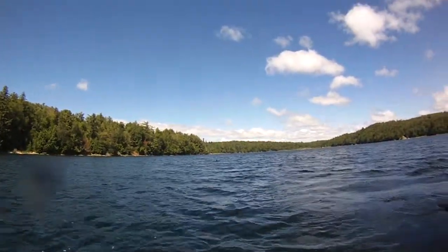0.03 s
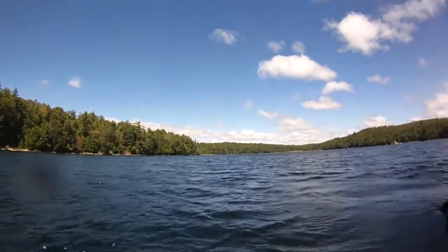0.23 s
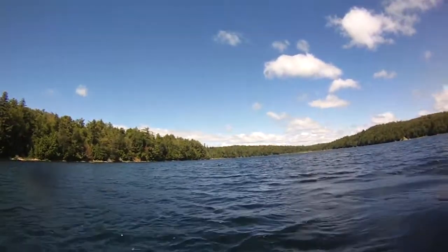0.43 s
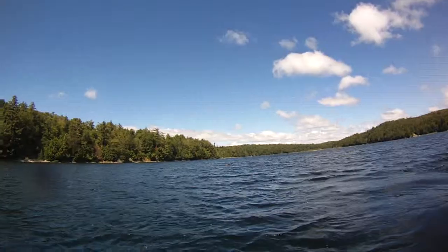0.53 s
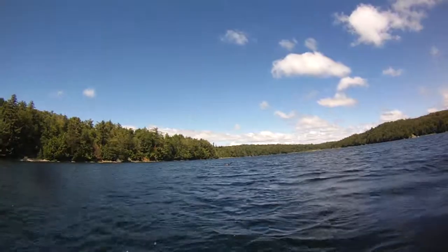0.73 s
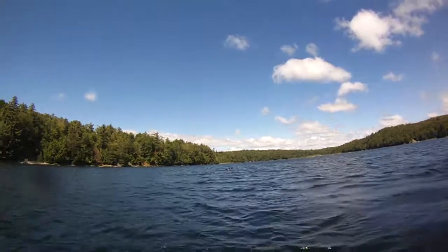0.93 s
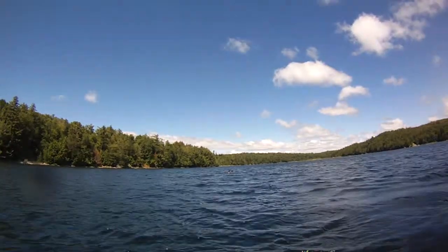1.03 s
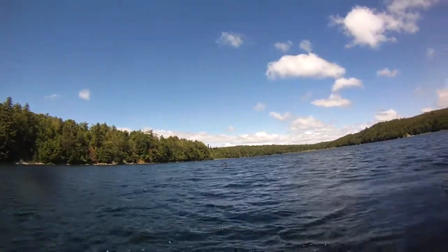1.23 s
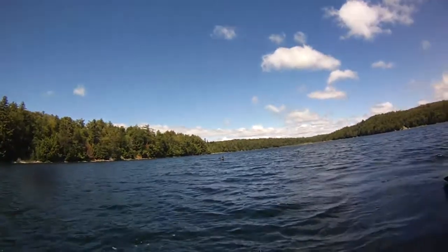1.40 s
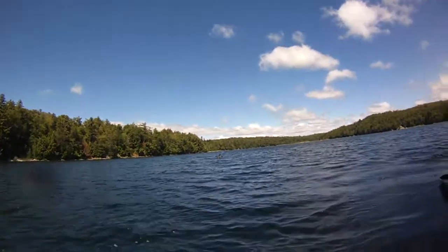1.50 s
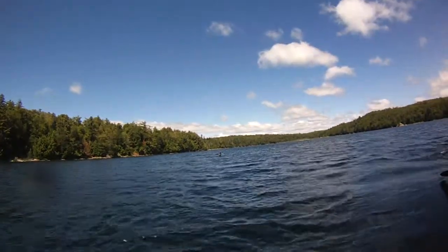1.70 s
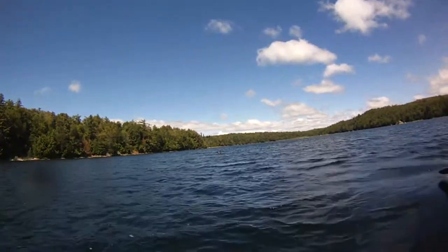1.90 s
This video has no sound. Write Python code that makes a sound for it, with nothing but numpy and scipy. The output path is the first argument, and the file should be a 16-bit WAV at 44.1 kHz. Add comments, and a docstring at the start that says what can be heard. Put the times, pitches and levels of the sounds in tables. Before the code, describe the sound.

One sharp knock on a camera case, with soft ripples bumping a boat hull over hiss.

```python
"""A small cased camera rides low on a boat over a quiet lake, its microphone hissing steadily. From 0.1 s come
light ticks on the case and soft, hollow bumps, probably ripples ringing the hull and pockets of trapped air,
over a low wash. At 0.24 s something knocks once against the case, with a short scuff, a few sharp contacts
around the blow and a faint after-ring of the mount. After 0.6 s ticks and bumps grow sparse; the last tick
falls at 1.3 s, the last bump at 1.8 s."""
import sys
import numpy as np
from scipy import signal
from scipy.fft import rfft, irfft
from scipy.io import wavfile

SR = 44100
rng = np.random.default_rng(int(sys.argv[2]) if len(sys.argv) > 2 else 0)


def log_audio(samples):
    """Write samples as a 16-bit WAV file to the path given in sys.argv[1]."""
    # one column per channel
    frames = np.atleast_2d(samples).T
    # limit to full scale, then quantise
    limited = np.clip(frames, -1, 1)
    pcm = np.round(limited * 32767).astype(np.int16)
    wavfile.write(sys.argv[1], SR, pcm)


N = 85995
TIME_S = np.arange(N) / SR

# contacts on the case: light ticks, plus the sharper contacts flanking the knock at 0.23-0.25 s: start_s,
# level_db, highpass_hz, lowpass_hz
CASE_CONTACTS = [(0.1024, -11.5, 1080, 1610), (.168, -13.5, 2500, 4500), (.2317, 2, 3200, 2700),
                 (.2320, -3, 3400, 3000), (.2326, -7, 900, 1800), (.2488, -5, 750, 4600),
                 (.273, -15, 1800, 3800), (0.566, -19, 2500, 6000), (.5883, -12.5, 1000, 4530),
                 (1.2992, -18.5, 1410, 2600)]
# case resonances: pitch_hz, width_hz, level_db
CASE_MODES = [(562, 247, 0.5), (830, 440, -0.5), (1200, 410, -8.5), (2110, 880, -2), (3450, 460, -9),
              (4270, 610, -17.5), (6100, 1220, -2), (7500, 400, -10.5), (10000, 1200, -9)]
# after-ring of the mount: freq_hz, relative_db
MOUNT_SPECTRUM = [(150, -32), (350, 5), (600, -16), (1500, -6.5), (2500, -1.5), (4500, 13.5), (7000, -2),
                  (14000, -11)]
# rubbing surfaces: freq_hz, relative_db
SCUFF_SPECTRUM = [(60, -13), (180, 4), (320, 3.5), (500, 2), (1200, -12.5), (3800, -1), (7000, -12.5),
                  (14000, -26)]
# water slaps on the hull: start_s, level_db, lowpass_hz, slosh_decay_s, air_pitch_hz
HULL_BUMPS = [(.121, -15.5, 350, .008, 250), (.151, -13.5, 603, 0.014, 330), (.174, -21.5, 300, .01, 230),
              (.183, -10, 400, 0.0054, 258), (.213, -20, 500, .006, 380), (.269, -14, 500, 0.014, 347),
              (0.349, -16.5, 600, .005, 364), (.373, -14.5, 700, 0.0056, 422),
              (0.421, -14.5, 400, 0.022, 310), (.475, -17.5, 500, 0.005, 370), (0.51, -7.5, 450, .006, 332),
              (.528, -10.5, 400, 0.02, 282), (0.8359, -15.5, 1500, 0.0023, 514),
              (1.143, -15, 350, 0.005, 270), (1.199, -12, 900, 0.0054, 200), (1.242, -17, 500, 0.0094, 337),
              (1.322, -17.5, 400, 0.015, 260), (1.540, -20.5, 400, 0.0041, 280),
              (1.802, -20, 300, .008, 200)]
# hull resonances: pitch_hz, width_hz, level_db
HULL_MODES = [(162, 80, -12.5), (230, 90, -6), (340, 146, -4), (410, 120, -12.5), (690, 320, -13.5)]
# water along the hull: freq_hz, relative_db
WASH_SPECTRUM = [(30, -42), (70, -9), (140, 0), (280, 10), (450, 4), (900, -5), (3000, -18), (12000, -19.5)]
# rise and fall of the wash: time_s, level_db
WASH_ENVELOPE = [(0, -62), (.08, -72.5), (.16, -61), (.32, -66), (.45, -67.5), (.55, -72), (.62, -82),
                 (1.05, -71.5), (1.22, -66.5), (1.4, -78.5), (1.8, -68), (1.95, -87)]
# hiss common to both channels: freq_hz, relative_db
HISS_MID_SPECTRUM = [(25, -32), (45, -19), (80, -12), (150, -5.5), (320, -1.5), (750, -1), (1500, -1),
                     (2100, -1), (3000, -1.5), (6000, -3), (10000, -4.5), (15000, -6.5)]
# hiss opposite in the two channels: freq_hz, relative_db
HISS_SIDE_SPECTRUM = [(30, -8), (100, -19), (300, -2), (800, -2), (1300, -14), (2000, -39.5), (14000, -26)]


def knock(start_s=.2409, level_db=9, rebound_s=.00062, rebound_db=-7.5):
    """Force of one heavy, dull blow; the case springs back."""
    rebound = from_db(rebound_db) * impulse(start_s + rebound_s)
    blow = from_db(level_db) * (rebound - impulse(start_s))
    softened = lowpass(lowpass(blow, cutoff_hz=960), cutoff_hz=9000)
    return highpass(softened, cutoff_hz=323)


def ticks():
    """Force of the ticks and of the contacts around the knock: soft ones lose treble, small ones carry little
    bass."""
    force = np.zeros(N)
    for start_s, level_db, highpass_hz, lowpass_hz in CASE_CONTACTS:
        softened = lowpass(lowpass(impulse(start_s), lowpass_hz), lowpass_hz)
        force += from_db(level_db) * highpass(softened, highpass_hz)
    return force


def camera_case(force, mount_gain_db=-39, mount_t60_s=.17):
    """Contacts ring the case, and the case rings its mount."""
    direct = resonate(force, CASE_MODES)
    decay = from_db(-60 * np.minimum(TIME_S / mount_t60_s, 2))
    mount_response = from_db(mount_gain_db) * decay * noise(MOUNT_SPECTRUM)
    return direct + signal.fftconvolve(direct, mount_response)[:N]


def scuff(peak_s=.2405, peak_db=-33.5, rise_fall_s=.0024):
    """Surfaces rub briefly, swelling into the knock and fading as fast."""
    envelope = np.exp(-np.minimum(np.abs(TIME_S - peak_s) / rise_fall_s, 20))
    return from_db(peak_db) * envelope * noise(SCUFF_SPECTRUM)


def hull_bumps(slosh_db=-27, air_width_hz=50, air_gain_db=2.5):
    """Each soft slap and its trailing slosh ring the hull and a pocket of trapped air."""
    water = from_db(slosh_db) * rng.standard_normal(N)
    force, air = np.zeros(N), np.zeros(N)
    for start_s, level_db, lowpass_hz, slosh_decay_s, air_pitch_hz in HULL_BUMPS:
        age_s = TIME_S - start_s
        slosh = water * (age_s > 0) * np.exp(-np.clip(age_s / slosh_decay_s, 0, 20))
        push = from_db(level_db) * lowpass(impulse(start_s) + slosh, lowpass_hz)
        force += push
        air += resonate(push, [(air_pitch_hz, air_width_hz, air_gain_db)])
    return resonate(force, HULL_MODES) + air


def wash():
    """Water runs along the hull: low noise that swells and sinks."""
    time_s, level_db = np.transpose(WASH_ENVELOPE)
    return from_db(np.interp(TIME_S, time_s, level_db)) * noise(WASH_SPECTRUM)


def microphone_hiss(mid_db=-54.3, side_db=-86.5):
    """Steady self-noise, nearly the same left and right."""
    mid = from_db(mid_db) * noise(HISS_MID_SPECTRUM)
    side = from_db(side_db) * noise(HISS_SIDE_SPECTRUM)
    return np.array([mid + side, mid - side])


def from_db(level_db):
    """Decibels to gain."""
    return 10 ** (np.asarray(level_db) / 20)


def noise(spectrum):
    """Coloured noise, rms 1."""
    freq_hz, relative_db = np.transpose(spectrum)
    bins_hz = np.maximum(np.arange(N // 2 + 1) * SR / N, 1)
    gain = from_db(np.interp(np.log(bins_hz), np.log(freq_hz), relative_db))
    coloured = irfft(rfft(rng.standard_normal(N)) * gain, N)
    return coloured / coloured.std()


def impulse(start_s):
    """Unit impulse."""
    x = np.full(N, 1e-18)
    x[int(start_s * SR)] = 1
    return x


def lowpass(x, cutoff_hz):
    """First-order treble cut."""
    return signal.lfilter(*signal.butter(1, cutoff_hz, fs=SR), x)


def highpass(x, cutoff_hz):
    """Second-order bass cut."""
    return signal.lfilter(*signal.butter(2, cutoff_hz, "high", fs=SR), x)


def resonate(force, modes):
    """Damped resonances in parallel."""
    ringing = np.zeros(N)
    for pitch_hz, width_hz, level_db in modes:
        radius = np.exp(-np.pi * width_hz / SR)
        feedback = [1, -2 * radius * np.cos(2 * np.pi * pitch_hz / SR), radius ** 2]
        gain = from_db(level_db) * (1 - radius ** 2) / 2
        ringing += gain * signal.lfilter([1, 0, -1], feedback, force)
    return ringing


def scene():
    """Case and water centred; only the hiss has a little width."""
    centre = camera_case(knock() + ticks()) + scuff() + hull_bumps() + wash()
    return centre + microphone_hiss()


def record(dry, highpass_hz=50, lowpass_hz=15400):
    """The recorder cuts the deep bass and, steeply, the top."""
    top_cut = signal.ellip(12, .1, 70, lowpass_hz, fs=SR, output="sos")
    return signal.sosfilt(top_cut, highpass(dry, highpass_hz))


dry = scene()
out = record(dry)
log_audio(out)
```